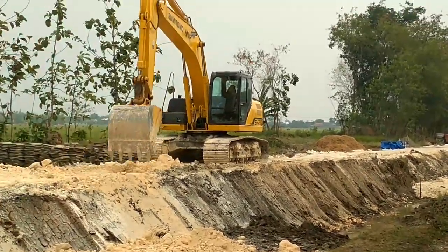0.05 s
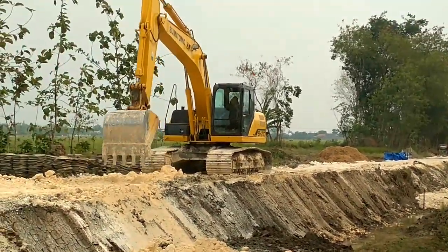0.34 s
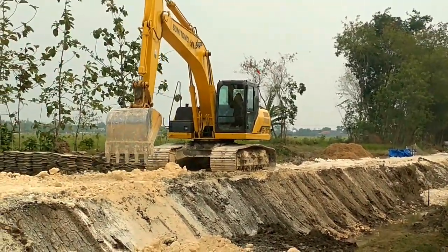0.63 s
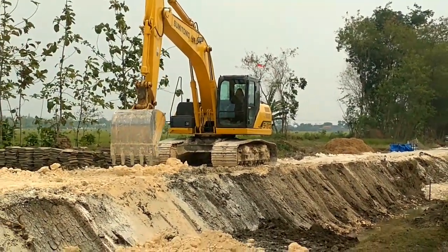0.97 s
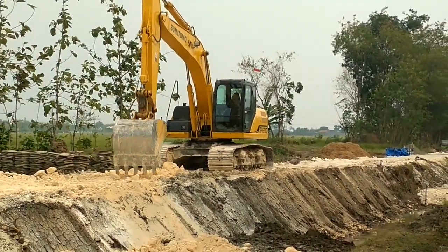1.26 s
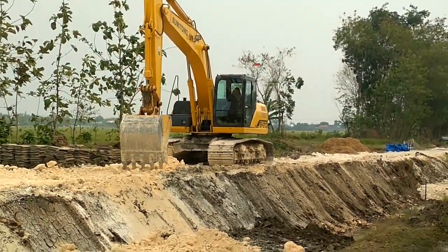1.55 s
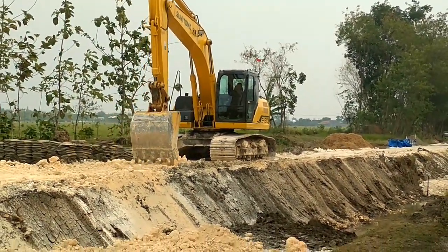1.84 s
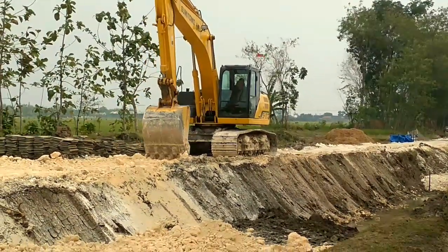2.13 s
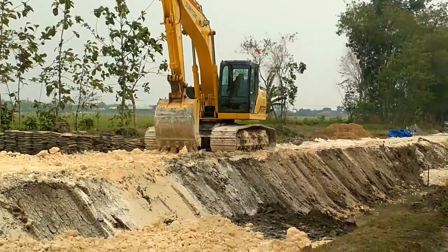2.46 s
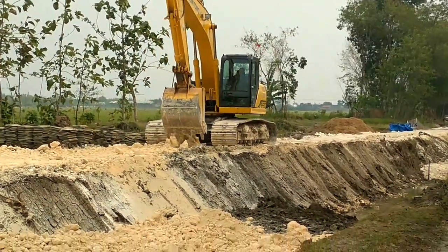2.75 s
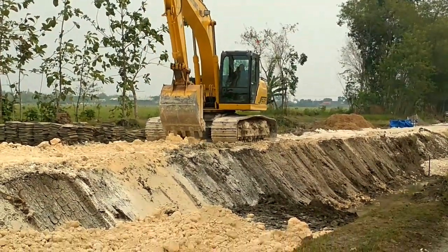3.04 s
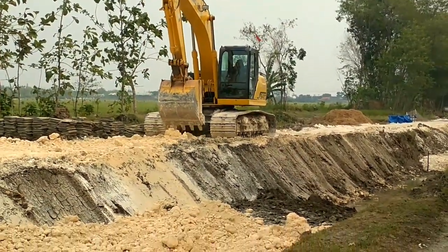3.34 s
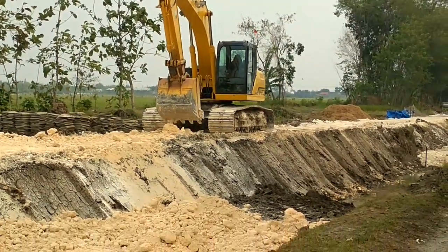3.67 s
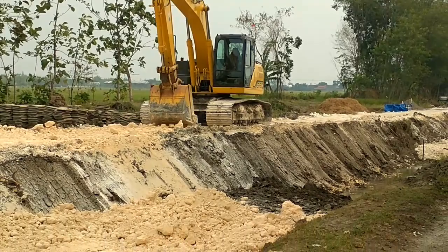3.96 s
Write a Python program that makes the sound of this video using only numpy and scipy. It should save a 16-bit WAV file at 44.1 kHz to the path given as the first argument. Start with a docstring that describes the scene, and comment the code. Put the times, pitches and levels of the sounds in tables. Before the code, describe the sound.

A working excavator rumbles and clanks faintly under gusts of wind popping on the microphone.

```python
"""Open fields, with a tracked excavator working some way off. Its diesel drones and clatters,
oil hisses through the valves with a thin gliding whistle, and the steel arm and bucket clank
and scrape a few times. Up close, wind rumbles, buffets and pops on the two microphone ports
separately and pushes them into a limiter."""
import sys
import numpy as np
from scipy import signal
from scipy.fft import rfft, irfft
from scipy.io import wavfile
from scipy.ndimage import uniform_filter1d, minimum_filter1d

SR = 44100
rng = np.random.default_rng(int(sys.argv[2]) if len(sys.argv) > 2 else 0)


def waveform_to_disk(signal):
    """Save audio, clipped to [-1, 1], as 16-bit WAV at the path in sys.argv[1]."""
    frames = np.transpose(np.atleast_2d(signal))
    scaled = np.clip(frames, -1, 1) * 32767
    samples = np.round(scaled).astype(np.int16)
    wavfile.write(sys.argv[1], SR, samples)


N = 176400
T = np.arange(N) / SR
HZ = np.fft.rfftfreq(N, 1 / SR)

# Level ride applied to the machine's hiss, partly followed by the engine; the sound dips sharply for moments at
# a time: time_s, level_db
MACHINE_RIDE = [(0, -42), (.03, -38.5), (.37, -36), (.55, -32), (.63, -38), (.745, -38), (.77, -47),
                (.85, -45.5), (.95, -39), (1.01, -47), (1.09, -40), (1.115, -47), (1.22, -48), (1.49, -42),
                (1.53, -47), (1.72, -43.5), (1.86, -46), (1.96, -42.5), (2.1, -47), (2.22, -41.5),
                (2.42, -47), (2.58, -50.5), (2.65, -44), (2.88, -41), (3.3, -42), (3.44, -46), (3.6, -42),
                (3.84, -44.5), (3.92, -40.5)]


def amp(db):
    """Decibels to gain."""
    return 10 ** (np.asarray(db) / 20)


def unit_rms(x):
    """Scales each channel to unit rms."""
    return x / np.sqrt(np.mean(x ** 2, axis=-1, keepdims=True) + 1e-20)


def eq_db(points):
    """Draws an EQ curve through the points, along log frequency."""
    hz, db = np.transpose(points)
    return np.interp(np.log(HZ + 1), np.log(hz + 1), db)


def automation(rows):
    """Draws one curve in time for each column after the first."""
    times, *columns = np.transpose(rows)
    return np.array([np.interp(T, times, column) for column in columns])


def noise(colour):
    """Coloured noise at unit rms, unrelated left and right."""
    return unit_rms(irfft(rfft(rng.standard_normal((2, N))) * colour, N))


def drift(rate_hz):
    """Smooth random stereo motion up to the given rate."""
    return noise(1 / np.sqrt(1 + (HZ / rate_hz) ** 8))


def engine():
    """A six-cylinder diesel: tones tied to the shaft speed, over clatter that pulses with each firing."""
    # Drone partials: shaft_multiple, level_db
    partials = [(4, -29), (5, -23.5), (6, -34), (9, -55), (12, -66), (15, -36.5), (19.33, -41)]
    # Colour of the engine and fan noise: freq_hz, gain_db
    clatter_eq = [(100, 4.5), (180, -11.5), (330, -21), (550, 3), (750, 0), (1080, -0.5), (1350, -1.5),
                  (1850, -9), (2120, -5.5), (2450, -5.5), (2800, -22), (3600, -20), (6000, -19.5)]
    shaft_hz, wander, firings_per_turn = 31.88, 0.0026, 3
    turns = np.cumsum(shaft_hz * (1 + wander * drift(rate_hz=3.5)[0])) / SR
    drone = 0
    for multiple, db in partials:
        phase = rng.random() + 0.17 * rng.standard_normal((2, 1))
        drone += amp(db) * np.sqrt(2) * np.sin(2 * np.pi * (multiple * turns + phase))
    firing = 1 + 0.2 * np.cos(2 * np.pi * firings_per_turn * turns)
    clatter = noise(amp(eq_db(clatter_eq)))
    clatter = unit_rms((clatter + 0.12 * clatter[::-1]) * firing)  # crossfeed narrows the image
    ride_db = 0.46 * (automation(MACHINE_RIDE) + 37.5)
    return (amp(-4.5) * drone + amp(-34.5) * clatter) * amp(ride_db)


def hiss_ripple(depth_db=5.5, spacing_hz=44.5):
    """Fine random peaks and dips, in dB, that give the hiss a faintly ringing texture."""
    knots_hz = np.arange(0, SR / 2, spacing_hz)
    heights = rng.standard_normal(len(HZ))[:len(knots_hz)]
    return depth_db * np.interp(HZ, knots_hz, heights)


def shifting_hiss(colour_db, patterns=6):
    """Hiss that crossfades at random between ripple patterns, so its fine colour shimmers."""
    fades = np.array([drift(rate_hz=3.96)[0] ** 2 for _ in range(patterns)])
    fades /= np.linalg.norm(fades, axis=0)
    return sum(fade * noise(amp(colour_db + hiss_ripple())) for fade in fades)


def hydraulics():
    """Flickering valve hiss, with a fuzzy whistle that glides as the oil flow changes."""
    # Colour of oil rushing through the valves: freq_hz, gain_db
    hiss_eq = [(1500, -9), (3000, 1), (3650, -11.5), (4500, -3), (5350, 3.5), (6200, -9), (7400, 1.5),
               (8300, -5), (9300, 1), (11000, 6), (12000, 6), (13400, 5.5), (14400, -5), (15300, -5.5)]
    # Stereo lean of that colour: freq_hz, left_minus_right_db
    hiss_lean = [(2000, 17), (3500, 1.5), (5500, 3), (7500, 5.5), (9200, 0.5), (11000, -2), (12300, 2.5),
                 (14500, -3.5)]
    # Path of the valve whistle: time_s, pitch_hz, level_db
    whistle_glide = [(0, 11100, -60), (.45, 10800, -33), (.7, 10360, -49), (1.1, 10400, -71),
                     (1.6, 9650, -52), (1.95, 10070, -47), (2.37, 10800, -46), (2.5, 10600, -55),
                     (2.75, 10660, -49), (2.95, 10580, -47), (3.25, 9700, -47), (3.45, 9400, -69),
                     (4, 10200, -54)]
    colour_db = eq_db(hiss_eq) + np.array([[.5], [-.5]]) * eq_db(hiss_lean)
    flicker_db = 1.5 * drift(rate_hz=16.5)[0]
    hiss_db = automation(MACHINE_RIDE) + flicker_db + [[4.5], [6.5]]  # left and right trims
    pitch_hz, whistle_db = automation(whistle_glide)
    tone = np.cos(2 * np.pi * np.cumsum(pitch_hz) / SR)
    whistle = unit_rms(drift(rate_hz=120) * tone)  # smears the tone into a narrow band
    return shifting_hiss(colour_db) * amp(hiss_db) + whistle * amp(whistle_db + [[-3], [1.5]])


def steel_knocks():
    """The arm and bucket knock, grind briefly and ring out in three groups of resonances."""
    # Clanks and scrapes: start_s, rise_s, t60_s, low_db, mid_db, high_db
    knocks = [(0.133, 0.0069, 0.22, -33.5, -31, -46), (0.213, 0.0063, 0.25, -32.5, -31, -47),
              (0.238, 0.014, 0.43, -22, -38, -56), (2.678, 0.0026, 0.049, -16.5, -24, -37),
              (2.688, 0.0025, 0.58, -35, -34, -38), (2.858, 0.0028, 0.18, -44, -36, -42),
              (3.068, 0.0083, 0.53, -37, -30, -46), (3.14, 0.0025, 0.21, -27, -24.5, -42),
              (3.196, 0.003, 0.92, -38.5, -37.5, -47), (3.48, 0.031, 0.63, -36.5, -34.5, -46)]
    # Low, middle and high resonances of the steel: pitch_hz, width_hz, level_db
    low_modes = [(725, 75, 6.5), (943, 220, 9.5), (1112, 90, 4), (1400, 150, -4)]
    mid_modes = [(1530, 380, 1), (2102, 105, -0.95), (2335, 350, -2.8)]
    high_modes = [(3050, 430, 0), (4120, 470, 4), (4960, 420, 6)]
    groups = (low_modes, 0, .55), (mid_modes, 1.8, -.12), (high_modes, -.6, .15)
    out = np.zeros((2, N))
    for group, (modes, lean_db, crossfeed) in enumerate(groups):
        ring = noise(sum(amp(db) / np.sqrt(width) / (1 + (2 * (HZ - hz) / width) ** 2)
                         for hz, width, db in modes))
        envelope = np.zeros(N)
        for start_s, rise_s, t60_s, *levels_db in knocks:
            attack = np.clip((T - start_s) / rise_s, 0, 1)
            decay_db = 60 * np.maximum(T - start_s - rise_s, 0) / t60_s
            envelope += attack * amp(levels_db[group] - decay_db)
        out += unit_rms(ring + crossfeed * ring[::-1]) * envelope * amp([[lean_db], [-lean_db]])
    grit_db = 0.5 * np.clip(drift(rate_hz=181)[0], -2, 2)
    return out * unit_rms(amp(grit_db))


def gusting(rate_hz, depth_db=6):
    """A gain that surges and sags at random with the wind on each port."""
    return unit_rms(amp(depth_db * np.clip(drift(rate_hz), -2, 1)))


def turbulence(eq, steadiness=0.56):
    """Coloured noise with its swings partly evened out, so each gust keeps its strength."""
    swings = signal.hilbert(noise(amp(eq_db(eq))))
    return unit_rms(swings.real / (abs(swings) ** 2 + .5) ** (steadiness / 2))


def eddy_crackle(eddies_per_s=1000):
    """Tiny eddies hit at random moments and blur into a rasp, coloured by the port."""
    # Colour of the rasp: freq_hz, gain_db
    rasp_eq = [(100, -27.5), (320, 4), (520, -0.5), (850, -11.5), (1400, -23.5), (2000, -36), (3200, -43),
               (8000, -100)]
    hits = (rng.random((2, N)) < eddies_per_s / SR) * rng.choice([-1, 1], (2, N))
    return unit_rms(irfft(rfft(hits) * amp(eq_db(rasp_eq)), N))


def wind():
    """Low rumble and light flutter, broken by buffets that each thump and rasp on one port."""
    # Colours of the wind layers: freq_hz, gain_db
    rumble_eq = [(8, -45), (22, 1.5), (45, 6.5), (80, 1), (140, 0.5), (300, -9.5), (1000, -43)]
    flutter_eq = [(20, -46), (60, -6), (110, 0), (180, -2.5), (280, -4), (450, -12.5), (900, -28.5),
                  (1800, -54), (5000, -85)]
    thump_eq = [(30, -6), (90, -5.5), (160, 3.5), (250, 0), (380, -7), (600, -20), (1400, -64), (4000, -82)]
    # Level ride of the fluttering breeze: time_s, left_db, right_db
    breeze = [(0.0, -29, -39), (0.3, -39, -23), (0.55, -36, -19), (0.75, -24, -21), (1.1, -20.5, -20.5),
              (1.5, -25.0, -12.5), (1.95, -19, -22.5), (2.1, -31, -12.5), (2.3, -35, -15.5),
              (2.55, -19, -27.5), (3.0, -20, -15.5), (3.5, -32.5, -22), (4.0, -15, -15.5)]
    # Blows of air: centre_s, length_s, thump_db, rasp_db, port (0 left, 1 right)
    buffets = [(0.057, 0.033, -17.5, -41, 0), (0.335, 0.019, -10, -39, 1), (0.366, 0.012, -13, -24, 1),
               (0.369, 0.011, -8.5, -34.0, 0), (0.444, 0.018, -16.0, -29, 0), (0.632, 0.043, -9.5, -38, 1),
               (0.679, 0.021, -9.5, -42, 1), (0.762, 0.049, -9, -22.5, 1), (0.807, 0.045, -28, -26, 0),
               (0.81, 0.016, -11, -15.5, 1), (0.872, 0.051, -16, -26.5, 1), (0.938, 0.067, -16.0, -22.5, 0),
               (1, 0.029, -6, -18, 1), (1.119, 0.008, -9, -11, 1), (1.177, 0.066, -10.5, -23, 1),
               (1.178, 0.045, -15, -16, 0), (1.239, 0.03, -7.5, -28, 1), (1.304, 0.046, -13, -18, 1),
               (1.314, 0.073, -21.5, -17.5, 0), (1.42, 0.018, -11, -18, 0), (1.526, 0.026, -37, -9, 0),
               (1.597, 0.03, -12, -15.5, 0), (1.636, 0.014, -8, -7, 0), (1.68, 0.016, -16.5, -14, 0),
               (1.718, 0.039, -25, -17, 0), (1.758, 0.14, -15.5, -36.5, 1), (1.795, 0.059, -17, -15, 0),
               (1.861, 0.016, -9, -18, 0), (1.899, 0.03, -8, -11, 1), (1.98, 0.051, -17, -16.5, 0),
               (1.99, 0.019, -14, -21, 1), (2.023, 0.015, -5, -38, 1), (2.063, 0.011, -5, -22.5, 1),
               (2.096, 0.015, -37, -10.5, 1), (2.249, 0.052, -8, -21.5, 1), (2.305, 0.018, -4.5, -10.5, 1),
               (2.358, 0.025, -20, -12.5, 1), (2.388, 0.042, -13.5, -23, 0), (2.41, 0.06, -9.5, -24.5, 1),
               (2.474, 0.015, -12.5, -18, 0), (2.491, 0.029, -17.5, -29, 1), (2.545, 0.11, -15, -17.5, 1),
               (2.697, 0.14, -12, -19, 1), (2.7, 0.052, -22, -20.5, 0), (2.816, 0.029, -18, -16.5, 1),
               (2.886, 0.029, -11.5, -21, 0), (2.914, 0.009, -33, -15.5, 1), (2.961, 0.034, -8, -18, 1),
               (3.062, 0.028, -14, -24, 0), (3.104, 0.02, -8.5, -16.5, 0), (3.14, 0.03, -15, -27, 0),
               (3.173, 0.0094, -7, -13, 1), (3.218, 0.039, -11, -23.5, 1), (3.235, 0.033, -16.5, -20, 0),
               (3.298, 0.041, -17, -29.5, 0), (3.324, 0.04, -7, -52, 1), (3.371, 0.052, -11, -23, 0),
               (3.398, 0.098, -12.5, -22.5, 1), (3.425, 0.018, -13, -15, 0), (3.474, 0.027, -11, -16.5, 0),
               (3.489, 0.036, -11.5, -23.5, 1), (3.556, 0.054, -18, -19.5, 0),
               (3.565, 0.032, -13.0, -27.5, 1), (3.608, 0.038, -11.5, -18.0, 0),
               (3.658, 0.017, -13, -15, 0), (3.66, 0.047, -13, -38.0, 1), (3.703, 0.017, -7.5, -37.5, 1),
               (3.746, 0.03, -12, -31, 1), (3.814, 0.063, -17.5, -18.5, 1), (3.878, 0.015, -3.5, -17, 1),
               (3.923, 0.034, -11.5, -46, 1)]
    gusts = amp(automation(breeze) + 1.87) * gusting(rate_hz=33)
    sputter = gusting(rate_hz=58)
    thump = turbulence(thump_eq) * np.sqrt(sputter)
    rasp = eddy_crackle() * sputter
    rumble = amp(-24) * noise(amp(eq_db(rumble_eq)))
    out = rumble + gusts * turbulence(flutter_eq)
    for centre_s, length_s, thump_db, rasp_db, port in buffets:
        near = abs(T - centre_s) < 2 * length_s
        swell = np.exp(-abs((T[near] - centre_s) / (0.49 * length_s)) ** 3)
        for layer, db in ((thump, thump_db - 0.58), (rasp, rasp_db + 1.98)):
            puff = swell * layer[port, near]
            puff_rms = np.sqrt(np.sum(puff ** 2) / (length_s * SR) + 1e-12)
            out[port, near] += amp(db) * puff / puff_rms
    return out


def eddy_pops(boost_db=7.5, steepness=2.72, cutoff_hz=2600):
    """Single eddies pass a port, each one sharp swing of pressure; the narrow port dulls them. The same kind of
    swing gives the hard crack of the bucket's knock near 2.68 s."""
    # Eddy strikes, and at 2.6846 s the sharp crack of the bucket's knock: centre_s, level_db, pitch_hz, port (0
    # left, 1 right)
    pops = [(0.751, -9.5, 390, 1), (1.1066, 13, 423, 1), (1.168, 5, 387, 0), (1.2462, 4, 417, 1),
            (1.2904, -1, 470, 1), (1.3238, -3, 415, 1), (1.504, 4, 473, 1), (1.5244, -7, 480, 0),
            (1.55, -8.5, 445, 1), (1.8076, 9, 470, 0), (1.8313, 15, 400, 1), (1.8562, 6, 445, 1),
            (1.9883, -11, 565, 0), (2.0212, -8, 555, 1), (2.087, -3, 397, 1), (2.2398, 10, 523, 1),
            (2.3517, -6.5, 470, 1), (2.4274, -6.5, 520, 1), (2.4702, 19, 660, 1), (2.555, -6, 400, 1),
            (2.6846, -3, 533, 1), (2.835, 16, 447, 1), (2.9997, -13, 476, 1), (3.053, -9, 430, 0),
            (3.4609, 4, 446, 0), (3.6465, -9.5, 427, 0)]
    offsets = np.arange(-600, 601)  # samples around a pop's centre
    t = offsets / SR
    out = np.zeros((2, N))
    for centre_s, db, pitch_hz, port in pops:
        phase = np.exp(2j * np.pi * rng.random())
        swing = phase * (1 - 2j * np.pi * pitch_hz * t / (steepness - 1)) ** -steepness
        out[port, round(centre_s * SR) + offsets] += amp(db + boost_db) * swing.real * np.hanning(len(t))
    return irfft(rfft(out) / np.sqrt(1 + (HZ / cutoff_hz) ** 8), N)


def scene():
    """The distant machine in open air, and the wind at the microphone."""
    return engine() + hydraulics() + steel_knocks() + wind() + eddy_pops()


def record(dry):
    """A fast limiter on each port, then a steep low-pass."""
    ceiling, window_s, cutoff_hz = 0.83, 0.0013, 15750
    window = int(window_s * SR)
    gain = np.minimum(1, ceiling / (abs(dry) + 1e-9))
    held_gain = minimum_filter1d(gain, window, axis=1)
    limited = dry * uniform_filter1d(held_gain, window, axis=1)
    lowpass = signal.firwin(601, cutoff_hz, window=("kaiser", 9), fs=SR)
    return signal.oaconvolve(limited, lowpass[None], "same")


dry = scene()
out = record(dry)
waveform_to_disk(out)
```